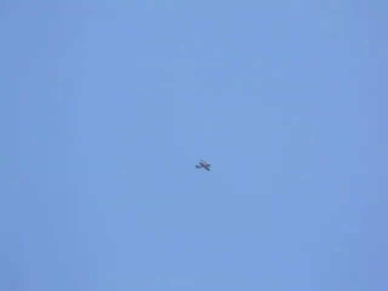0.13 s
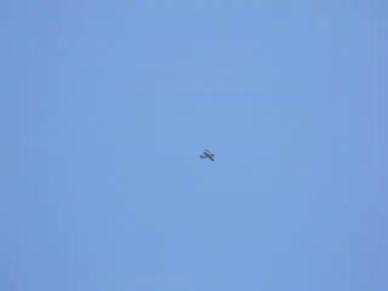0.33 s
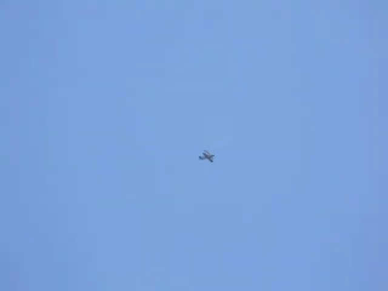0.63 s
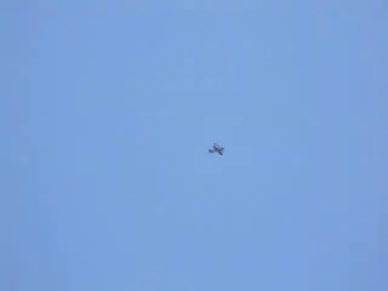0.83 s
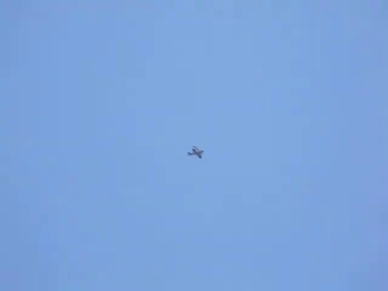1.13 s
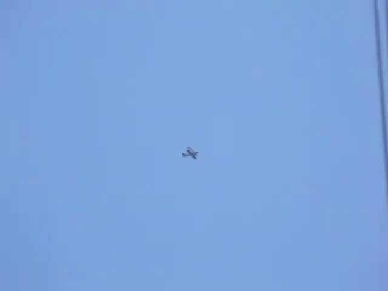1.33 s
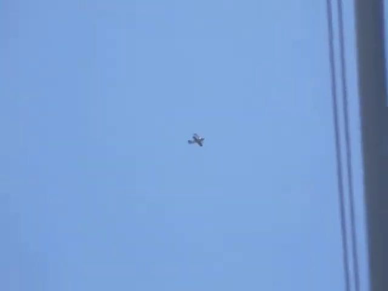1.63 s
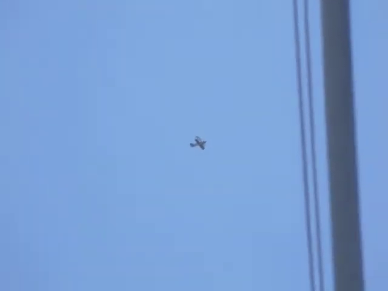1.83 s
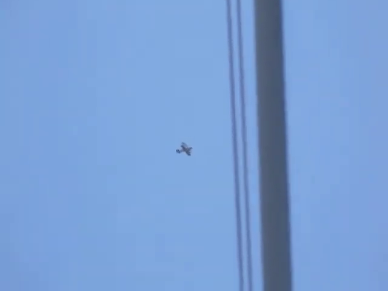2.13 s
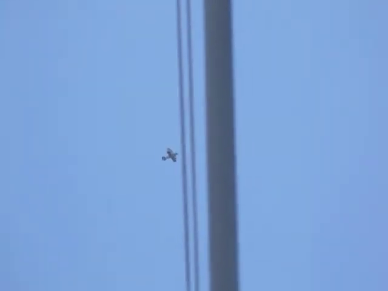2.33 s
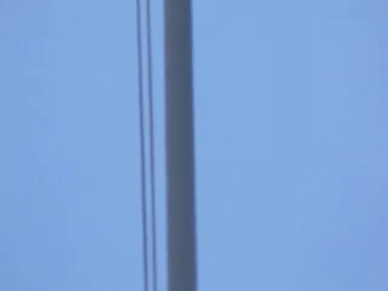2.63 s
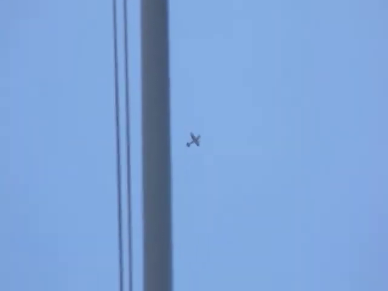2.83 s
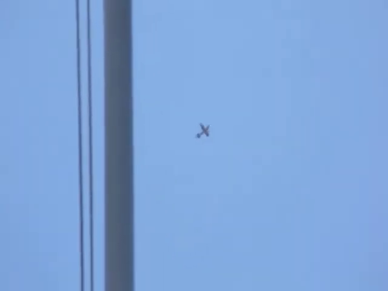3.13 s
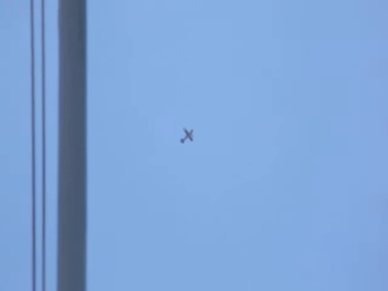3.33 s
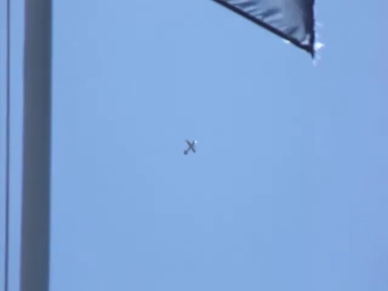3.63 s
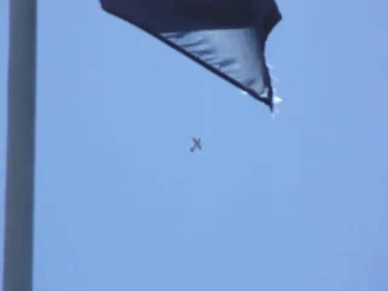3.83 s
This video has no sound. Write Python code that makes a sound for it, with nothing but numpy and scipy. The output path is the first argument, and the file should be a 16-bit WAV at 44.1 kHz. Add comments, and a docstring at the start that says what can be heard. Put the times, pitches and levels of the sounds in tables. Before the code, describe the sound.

Distant propeller aircraft drone, faint at first, then two rough swells, with low hum and hiss.

```python
"""A faint drone over low hum and outdoor air: a small propeller plane turns far overhead.
The drone rises, then sinks in pitch and swells twice. The propeller is a set of clean harmonics
that fade in the moving air; the exhaust is lines between them plus pulsed noise, a lumpy rasp
that cracks in the first swell. Background is wavering sines, coloured noise and faintly buzzing
hiss; two small ticks close by are bursts of band noise."""
import sys
import numpy as np
from scipy import signal
from scipy.fft import rfft, irfft, next_fast_len
from scipy.io import wavfile
from scipy.ndimage import uniform_filter1d, map_coordinates

SR = 44100
rng = np.random.default_rng(int(sys.argv[2]) if len(sys.argv) > 2 else 0)


def unload_wav(signal):
    """Save mono or channel-first audio to the path in sys.argv[1] as 16-bit WAV at rate SR, clipped to [-1, 1]."""
    wavfile.write(
        sys.argv[1],
        SR,
        np.round(np.clip(np.atleast_2d(signal).T, -1, 1) * 32767).astype(np.int16),
    )


N = 176400

# low wavering hum (frequency [Hz], level [dB])
HUM_LINES = [(58, -52), (67.5, -57), (87, -52.5), (101.5, -53), (115.5, -51.5)]
# gain on the deepest hum line (time [s], gain [dB])
DEEPEST_HUM_GAIN = [(0, 9.5), (.5, 9), (.92, 0.5), (1.3, 2.5), (2.4, 9), (3.33, 5), (3.55, -14),
                    (3.72, -18), (3.9, 11.5)]
# outdoor air, relative spectrum (frequency [Hz], level [dB])
AIR_SPECTRUM = [(20, -8.5), (40, -2.5), (100, 3), (170, -1), (300, -2), (500, -5), (800, -16), (1300, -4),
                (1600, -14.5), (2200, -20.5), (3000, -62)]
# microphone hiss, relative spectrum (frequency [Hz], level [dB])
HISS_SPECTRUM = [(1060, -34), (1800, -5), (2500, -1.5), (3040, -6.5), (3490, -4), (4340, -6), (5400, -6),
                 (7220, -8.5), (8030, -12.5), (8750, -28), (11400, -58)]
# buzzing part of the hiss (time [s], level [dB])
BUZZ_LEVEL = [(0, -78), (2.2, -74), (2.35, -60), (2.6, -62), (3.1, -68), (3.55, -66), (3.7, -57),
              (3.9, -57), (4, -62)]
# small ticks (time [s], level [dB], centre [Hz], width [octaves], 1/e half-length [s])
TICK_BURSTS = [(0.655, -51, 6900, 0.16, 0.0032), (0.713, -35, 1530, 0.49, 0.0036)]
# exhaust lines, relative (multiple of engine cycle, level [dB])
EXHAUST_ORDERS = [(8, -9), (9, -14), (10, -15.5), (14, -13.5), (20, -15.5), (21, -19.5), (22, -20)]
# all exhaust lines (time [s], level [dB])
EXHAUST_LINE_LEVEL = [(0, -40), (.9, -51), (1.6, -42.5), (2.1, -36.5), (3.1, -36.5), (3.5, -42.5), (4, -41)]
# rasp near 500 Hz, near 800 Hz and in the treble (time [s], level [dB])
RASP_LOW_LEVEL = [(0, -47), (.9, -56), (1.3, -43.5), (1.48, -49), (1.6, -39.5), (1.72, -50.5),
                  (2.05, -47.5), (2.23, -34.5), (2.4, -37.5), (2.7, -50), (2.9, -35), (3.02, -37),
                  (3.15, -41), (3.55, -46.5), (4, -55)]
RASP_MID_LEVEL = [(0, -53), (1.25, -52.5), (1.42, -47), (1.55, -50.5), (2.05, -44), (2.28, -37),
                  (2.4, -39.5), (2.52, -44), (2.75, -48.5), (2.98, -38), (3.13, -35), (3.27, -47.5),
                  (4, -48)]
RASP_TREBLE_LEVEL = [(1.1, -68), (1.28, -52), (1.8, -60.5), (2.05, -45.5), (2.21, -35.5), (2.37, -49.5),
                     (2.5, -48), (2.6, -43.5), (2.73, -55), (2.87, -40), (2.97, -49), (3.05, -35.5),
                     (3.13, -40), (3.22, -50), (4, -50.5)]
# relative spectra of the same three bands (frequency [Hz], level [dB])
RASP_LOW_SPECTRUM = [(150, -28.5), (280, -3.5), (400, -4.5), (520, 4.5), (640, -1), (780, -13),
                     (1200, -50.5)]
RASP_MID_SPECTRUM = [(450, -37.5), (670, 0.5), (790, 1.5), (940, 0.5), (1080, -14), (1600, -52)]
RASP_TREBLE_SPECTRUM = [(800, -30), (1080, -5), (1220, 2), (1420, 1.5), (1580, -13), (1800, -9),
                        (2050, -24), (2500, -21), (3200, -32), (6000, -60)]
# brief bright flare of the rasp (time [s], level [dB], centre [Hz], width [octaves], 1/e half-length [s])
RASP_FLARES = [(3.047, -43, 1600, 0.46, 0.026)]
# exhaust cracks, about one engine cycle apart (time [s], level [dB])
EXHAUST_CRACKS = [(2.2025, -22), (2.242, -21.5), (2.281, -18.5), (2.3205, -21), (2.3605, -22),
                  (2.397, -20.5), (2.438, -26)]
# noise puff around a crack, relative spectrum (frequency [Hz], level [dB])
PUFF_SPECTRUM = [(300, -26), (560, 10), (950, 9), (1350, -2.5), (2400, -44)]
# blade-passing rate as heard (time [s], rate [Hz])
BLADE_RATE = [(0, 144.7), (.5, 143.8), (1, 146.3), (1.45, 148.6), (1.7, 150.5), (1.92, 153.2),
              (2.25, 151.8), (2.58, 151.2), (3, 148.1), (3.25, 146.1), (3.55, 144.1), (4, 142)]
# propeller harmonics 1 to 6 (time [s], level [dB])
HARMONIC_1 = [(0, -46), (.75, -51.5), (1.35, -42.5), (1.8, -50.5), (2.2, -39), (3, -34.5), (3.3, -34.5),
              (3.65, -44), (4, -38)]
HARMONIC_2 = [(0, -52.5), (0.499, -49), (.8, -56.5), (1.2, -52.5), (1.48, -45), (1.6, -50), (1.72, -40),
              (1.95, -30), (2.15, -25), (2.45, -25.5), (2.68, -29), (2.85, -25), (3.03, -29), (3.38, -42),
              (3.6, -35), (3.78, -43.5), (4, -32.5)]
HARMONIC_3 = [(0, -50), (.5, -47), (.75, -51), (1.1, -54), (1.25, -46), (1.42, -40.5), (1.52, -45.5),
              (1.7, -44), (1.82, -55), (1.97, -46.5), (2.17, -31), (2.72, -34), (2.85, -28), (3.05, -26.5),
              (3.18, -36.5), (3.3, -33), (3.65, -38), (3.76, -49), (3.83, -38.5), (3.9, -33), (4, -38)]
HARMONIC_4 = [(0, -69), (1.299, -61), (1.56, -56), (1.85, -64), (2.05, -43.5), (2.4, -33), (2.65, -47),
              (2.779, -44), (2.88, -36), (3, -29.5), (3.12, -34.5), (3.26, -31.5), (3.42, -42.5),
              (3.65, -48.5), (4, -42.5)]
HARMONIC_5 = [(1.2, -63), (1.8, -49.5), (2.05, -59), (2.38, -37.5), (2.5, -49.5), (2.76, -46), (2.88, -32),
              (2.98, -29), (3.06, -36), (3.13, -30.5), (3.37, -42), (3.5, -49), (3.6, -41), (3.72, -39.5),
              (3.84, -52), (3.92, -38.5), (4, -45)]
HARMONIC_6 = [(1.4, -72.5), (2, -48.5), (2.35, -43), (2.5, -56.5), (2.63, -39.5), (2.8, -53.5), (2.95, -34),
              (3.1, -31.5), (3.22, -44), (3.3, -41), (3.46, -56), (3.58, -42.5), (3.75, -46.5), (4, -46.5)]
# higher harmonics, relative (multiple of blade rate, level [dB])
HIGH_HARMONICS = [(7, -4.5), (8, 1.5), (9, -1), (10, -16.5), (12, -14)]
# all higher harmonics (time [s], level [dB])
HIGH_HARMONIC_LEVEL = [(1.6, -64.5), (2.3, -49.5), (2.7, -54), (2.87, -41.5), (3.08, -38.5), (3.22, -49),
                       (3.4, -48), (3.7, -55), (4, -49)]

AIR_DB, HISS_DB, BUZZ_HZ = -43, -54, 30
HUM_FADE_DB, HUM_DRIFT_RAD = 0.9, 0.13
BLADES_PER_CYCLE = 6  # blade passes in one engine cycle
BLADE_CHOP, CYCLE_THROB = 0.41, 0.28  # rasp pulsing depth, in the exponent
PATCHY_DB = 1.4
CRACK_WIDTH_S, PUFF_S, PUFF_DB = 0.00046, 0.0036, -11.5  # 1/e half-widths; puff relative to crack
HIGH_FADE_DB, HIGH_FADE_KNOTS_PER_S, FLUTTER_RAD = 2.5, 18, 0.05
TOP_HZ = 8700


def amp(db):
    """Decibels to gain."""
    return 10 ** (np.asarray(db) / 20)


def unit(x):
    """Scale to rms 1."""
    return x / np.sqrt(np.mean(x ** 2) + 1e-20)


def curve(rows):
    """Interpolate a (time [s], value) table to every sample."""
    return np.interp(np.arange(N) / SR, *np.transpose(rows))


def wobble(knots_per_s):
    """Smooth random curve: a spline through normal draws."""
    position = np.arange(N) * knots_per_s / SR + 2
    return map_coordinates(rng.standard_normal(1024), [position], mode="wrap")


def filtered(x, response):
    """Multiply the spectrum of x by a response of frequency, zero-padded."""
    size = next_fast_len(N + SR // 4)
    return irfft(rfft(x, size) * response(np.fft.rfftfreq(size, 1 / SR)), size)[:N]


def noise(spectrum, gate=1):
    """Gated noise of rms 1, coloured by a (frequency [Hz], level [dB]) table."""
    f, db = np.transpose(spectrum)

    def response(hz):
        return amp(np.interp(np.log(hz + 1), np.log(f + 1), db))

    return unit(filtered(gate * rng.standard_normal(N), response))


def line(phase, fade_db, drift_rad, knots_per_s):
    """Sine of rms near 1 whose level and phase wander."""
    gain = np.sqrt(2) * amp(fade_db * wobble(knots_per_s))
    start = rng.uniform(0, 2 * np.pi)
    return gain * np.cos(phase + drift_rad * wobble(knots_per_s) + start)


def bursts(rows, gate=1):
    """Bell-shaped bursts of band noise, one for each row."""
    t, out = np.arange(N) / SR, np.zeros(N)
    for time_s, db, centre_hz, width_oct, length_s in rows:
        def response(hz):
            return np.exp(-.5 * (np.log2((hz + 1) / centre_hz) / width_oct) ** 2)

        band = unit(filtered(gate * rng.standard_normal(N), response))
        out += amp(db) * band * np.exp(-((t - time_s) / length_s) ** 2)
    return out


def patchy(x, depth_db):
    """Moving air fades neighbouring bands in and out: a smoothed random gain over the STFT."""
    z = signal.stft(x, nperseg=1024)[2]
    field = uniform_filter1d(rng.standard_normal(z.shape), size=4, axis=0)  # across frequency
    field = uniform_filter1d(field, size=12, axis=1)  # across time
    return unit(signal.istft(z * amp(depth_db * unit(field)), nperseg=1024)[1][:N])


def background():
    """Wavering low hum sines, outdoor air noise, and hiss with a faint pulsed buzz."""
    turn = 2 * np.pi * np.arange(N) / SR
    deepest, *others = [amp(db) * line(hz * turn, HUM_FADE_DB, HUM_DRIFT_RAD, knots_per_s=2.6)
                        for hz, db in HUM_LINES]
    hum = amp(curve(DEEPEST_HUM_GAIN)) * deepest + sum(others)
    air = amp(AIR_DB) * noise(AIR_SPECTRUM)
    hiss = amp(HISS_DB) * noise(HISS_SPECTRUM)
    buzz_gate = np.exp(2 * np.cos(BUZZ_HZ * turn))
    buzz = amp(curve(BUZZ_LEVEL)) * noise(HISS_SPECTRUM, buzz_gate)
    return hum + air + hiss + buzz


def ticks():
    """Small ticks close by: millisecond bursts of band noise."""
    return bursts(TICK_BURSTS)


def cracks():
    """The exhaust cracks in the first swell: a sharp pulse inside a puff of noise."""
    t, out = np.arange(N) / SR, np.zeros(N)
    puff = amp(PUFF_DB) * noise(PUFF_SPECTRUM)
    for time_s, db in EXHAUST_CRACKS:
        u = (t - time_s) / CRACK_WIDTH_S
        pulse = (2 * u ** 2 - 1) * np.exp(-u ** 2)
        out += amp(db) * (pulse + puff * np.exp(-((t - time_s) / PUFF_S) ** 2))
    return out


def exhaust(phase):
    """Uneven firings put lines between the harmonics; rasp pulses with blades and engine cycle."""
    cycle = phase / BLADES_PER_CYCLE
    lines = sum(amp(db) * line(k * cycle, fade_db=3.0, drift_rad=0.33, knots_per_s=7)
                for k, db in EXHAUST_ORDERS)
    gate = np.exp(BLADE_CHOP * np.cos(phase) + CYCLE_THROB * np.cos(cycle))
    bands = [(RASP_LOW_LEVEL, RASP_LOW_SPECTRUM),
             (RASP_MID_LEVEL, RASP_MID_SPECTRUM),
             (RASP_TREBLE_LEVEL, RASP_TREBLE_SPECTRUM)]
    rasp = sum(amp(curve(level)) * patchy(noise(spectrum, gate), PATCHY_DB)
               for level, spectrum in bands)
    return amp(curve(EXHAUST_LINE_LEVEL)) * lines + rasp + bursts(RASP_FLARES, gate)


def propeller(phase):
    """Blade-rate harmonics: four firm low ones, and higher ones that fade and flutter."""
    low_levels = [HARMONIC_1, HARMONIC_2, HARMONIC_3, HARMONIC_4]
    low = sum(amp(curve(level)) * line(k * phase, fade_db=0.82, drift_rad=0.055, knots_per_s=18)
              for k, level in enumerate(low_levels, 1))
    shaken = phase + FLUTTER_RAD * wobble(45)  # flutter shared by all higher harmonics
    middle = sum(amp(curve(level)) * line(k * shaken, fade_db=1.3, drift_rad=0.35, knots_per_s=22)
                 for k, level in enumerate([HARMONIC_5, HARMONIC_6], 5))
    high = sum(amp(db) * line(k * shaken, HIGH_FADE_DB, 0.55, HIGH_FADE_KNOTS_PER_S)
               for k, db in HIGH_HARMONICS)
    return low + middle + amp(curve(HIGH_HARMONIC_LEVEL)) * high


def scene():
    """One shaft phase drives propeller, exhaust lines and rasp; cracks, ticks and background do not follow it."""
    phase = 2 * np.pi * np.cumsum(curve(BLADE_RATE)) / SR
    return (background() + ticks() + cracks() + exhaust(phase) + propeller(phase))[None]


def record(dry):
    """Band limit: gain ramps from 1 to 0 over 400 Hz centred on TOP_HZ."""
    return filtered(dry[0], lambda hz: np.clip((TOP_HZ - hz) / 400 + .5, 0, 1))[None]


dry = scene()
out = record(dry)
unload_wav(out)
```